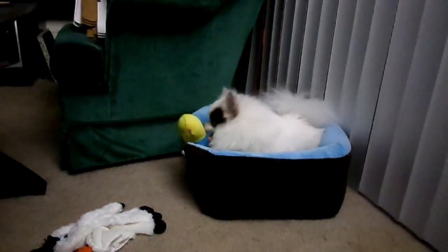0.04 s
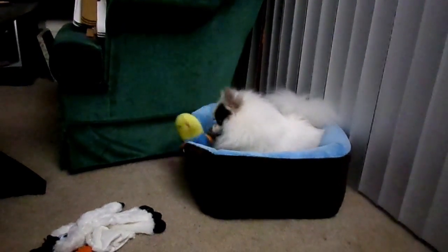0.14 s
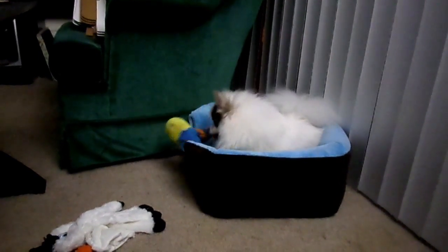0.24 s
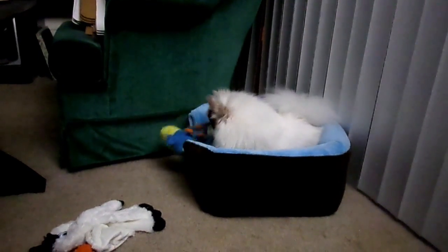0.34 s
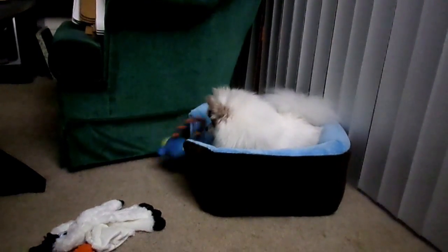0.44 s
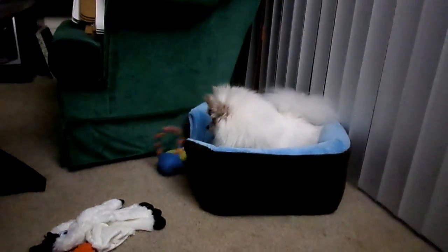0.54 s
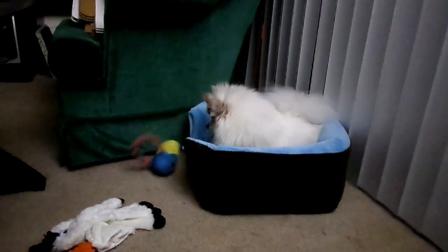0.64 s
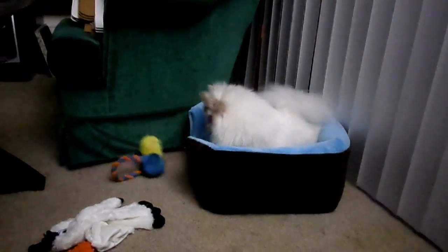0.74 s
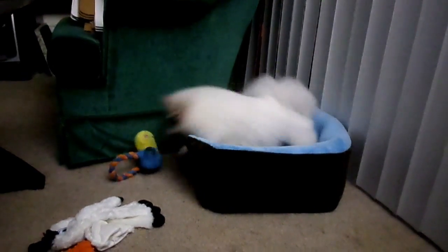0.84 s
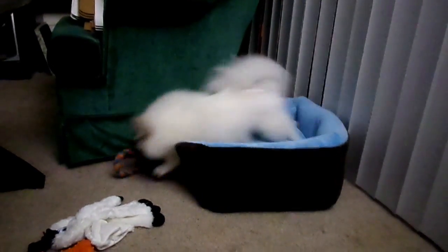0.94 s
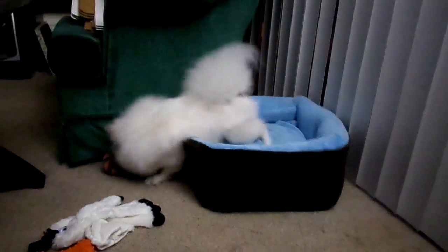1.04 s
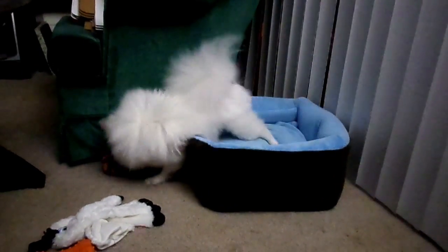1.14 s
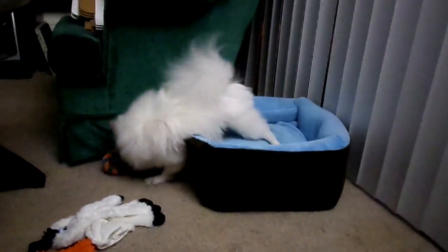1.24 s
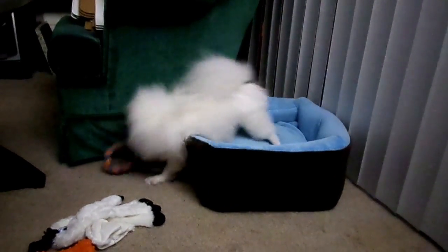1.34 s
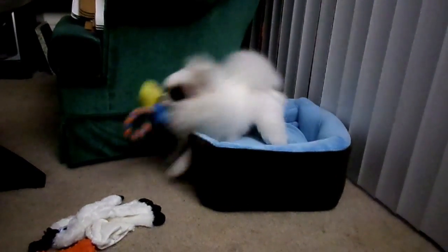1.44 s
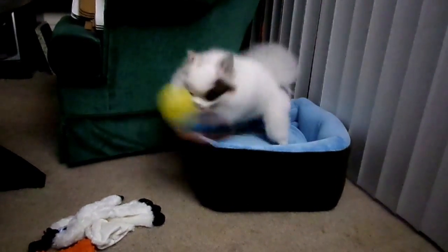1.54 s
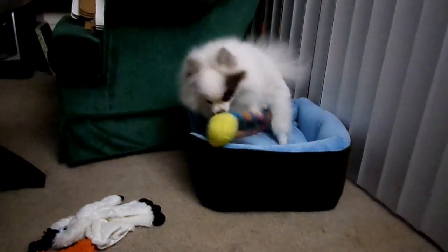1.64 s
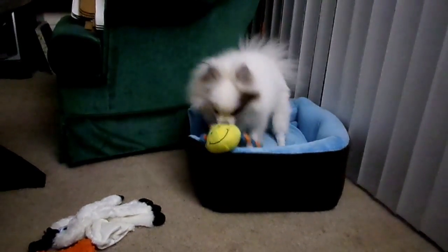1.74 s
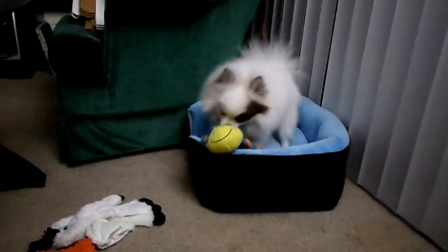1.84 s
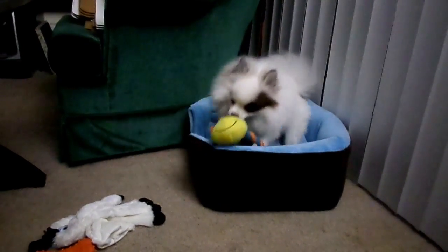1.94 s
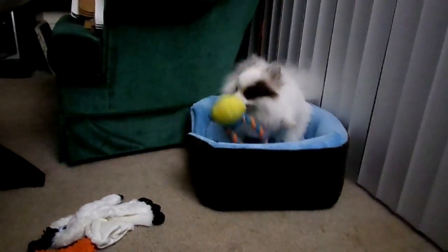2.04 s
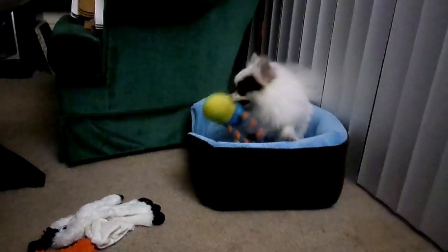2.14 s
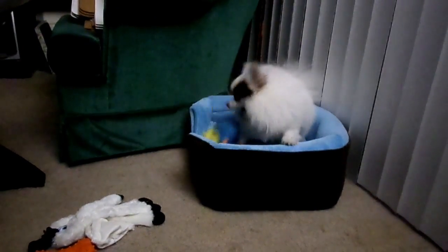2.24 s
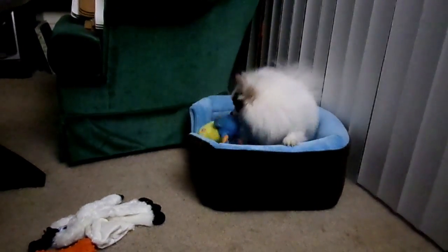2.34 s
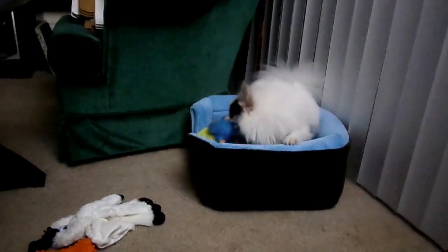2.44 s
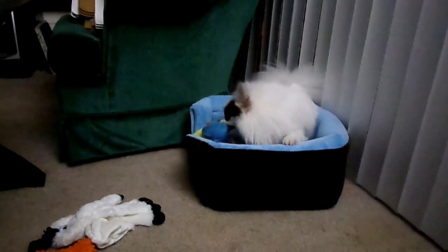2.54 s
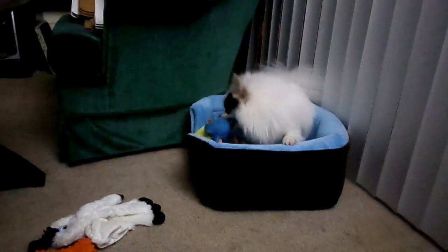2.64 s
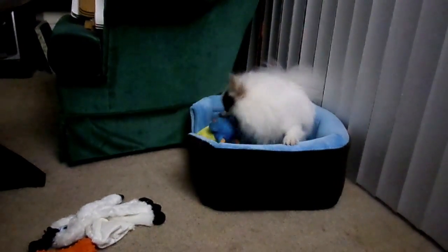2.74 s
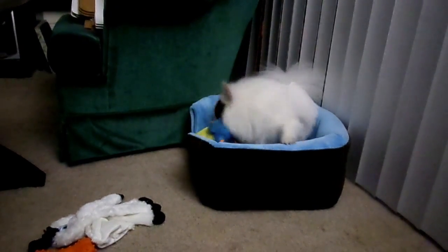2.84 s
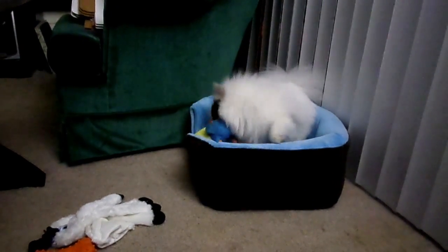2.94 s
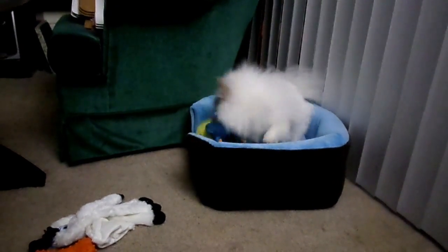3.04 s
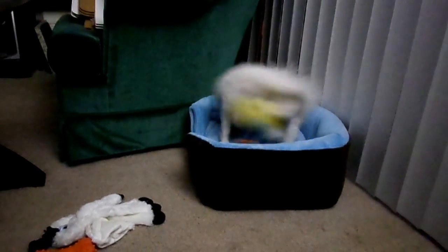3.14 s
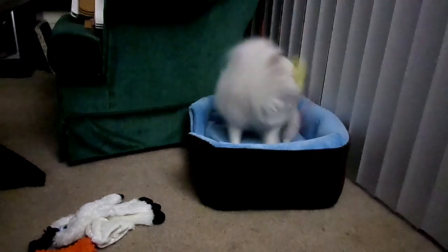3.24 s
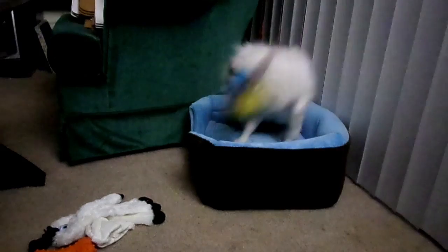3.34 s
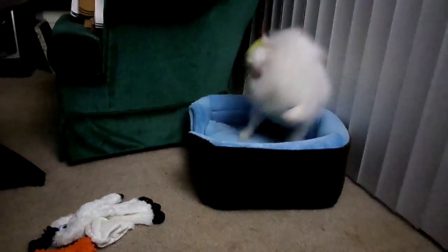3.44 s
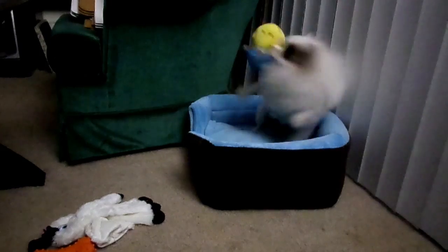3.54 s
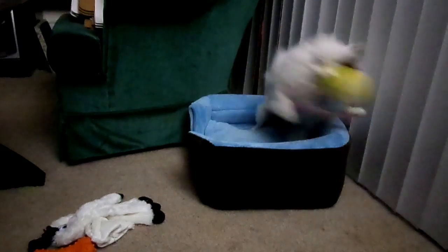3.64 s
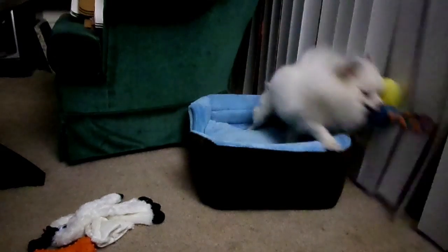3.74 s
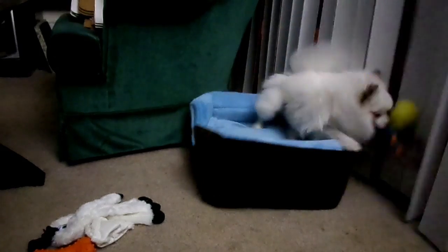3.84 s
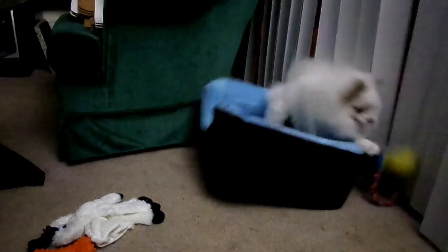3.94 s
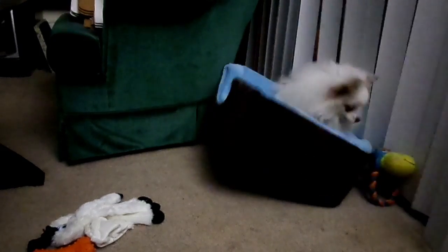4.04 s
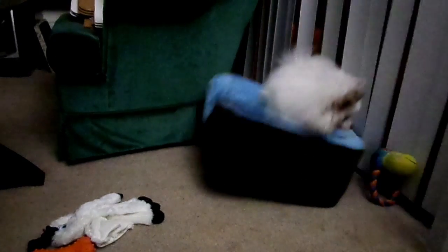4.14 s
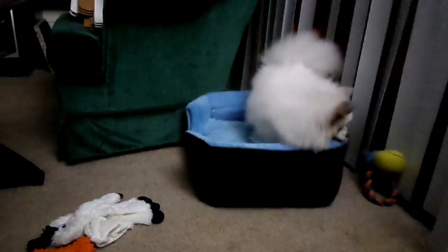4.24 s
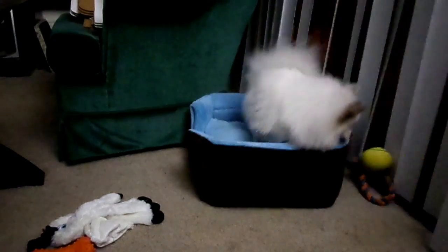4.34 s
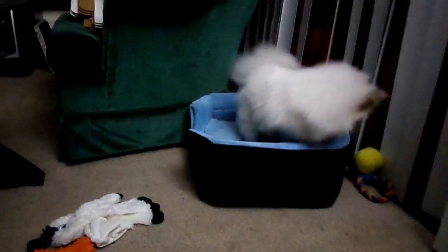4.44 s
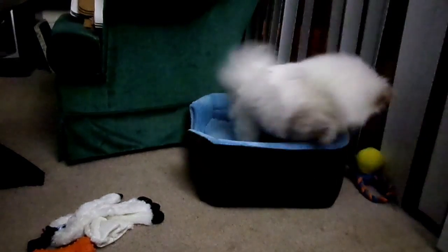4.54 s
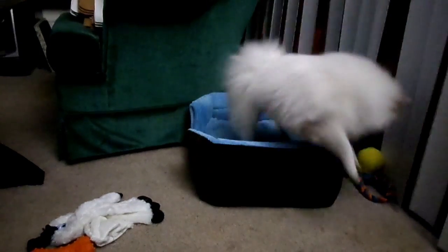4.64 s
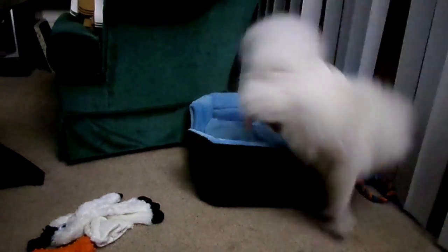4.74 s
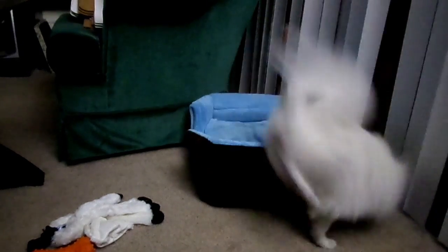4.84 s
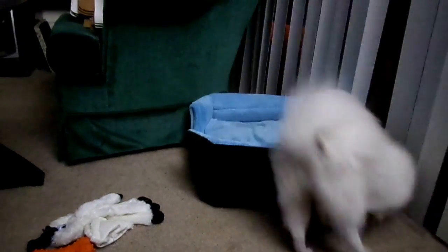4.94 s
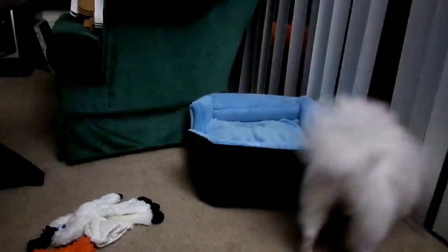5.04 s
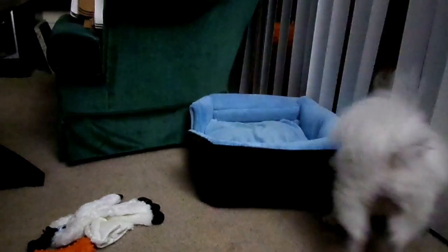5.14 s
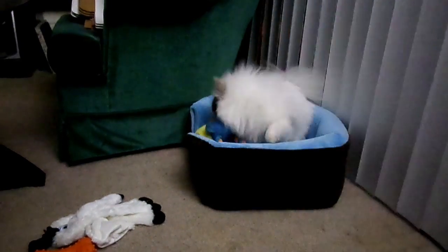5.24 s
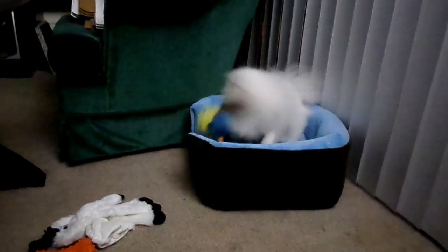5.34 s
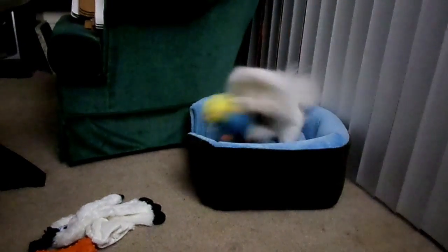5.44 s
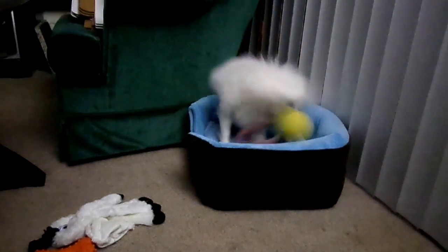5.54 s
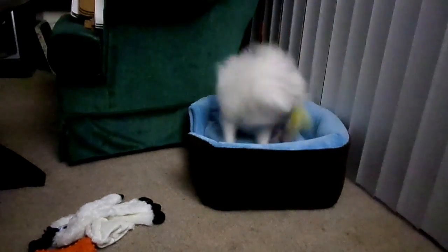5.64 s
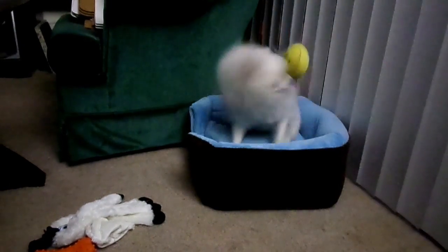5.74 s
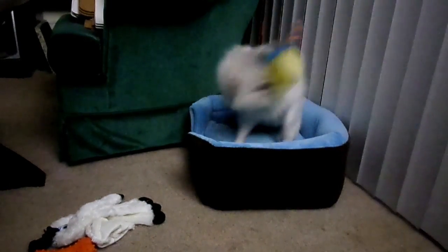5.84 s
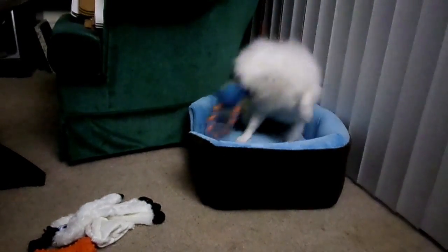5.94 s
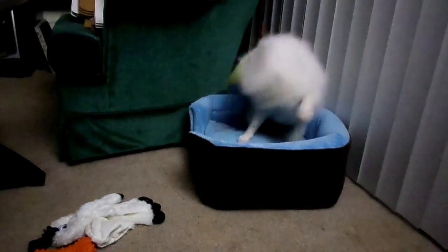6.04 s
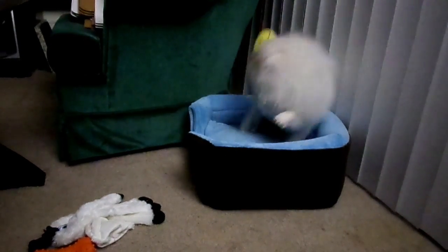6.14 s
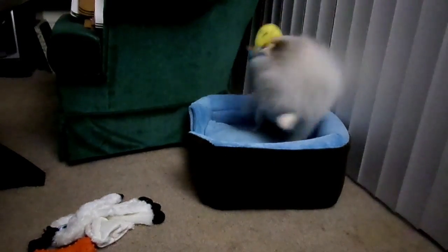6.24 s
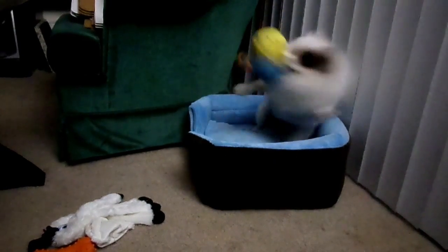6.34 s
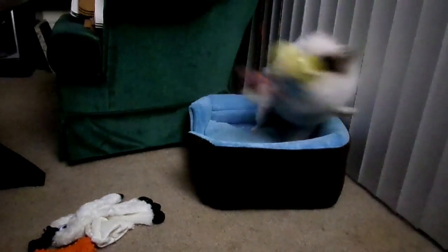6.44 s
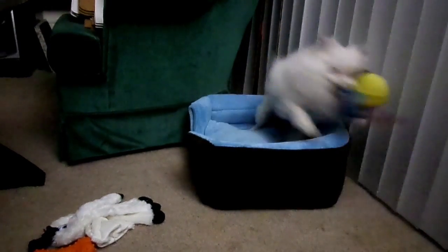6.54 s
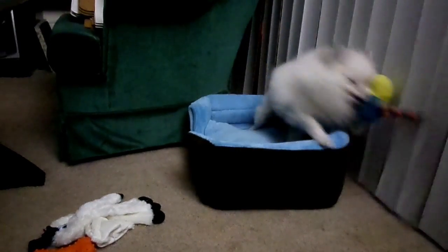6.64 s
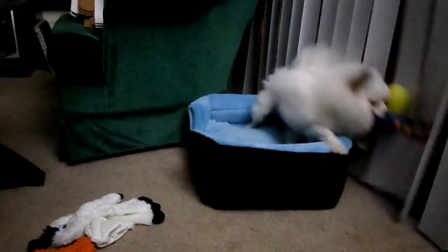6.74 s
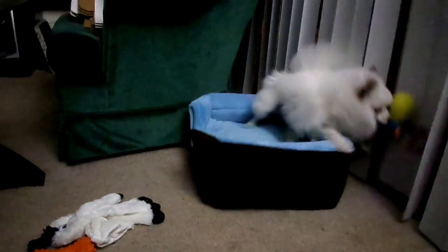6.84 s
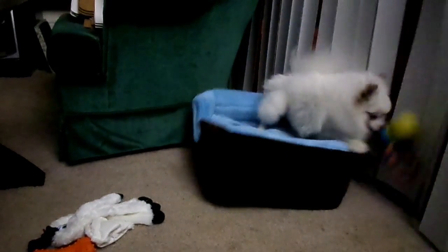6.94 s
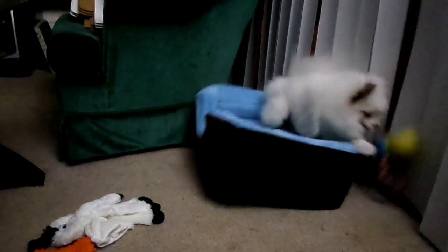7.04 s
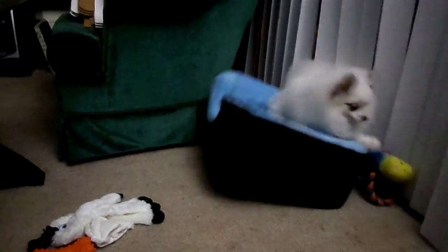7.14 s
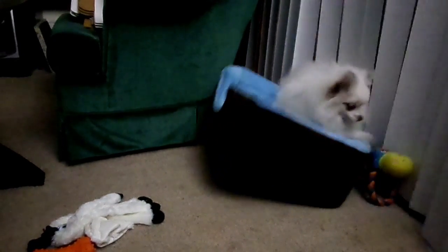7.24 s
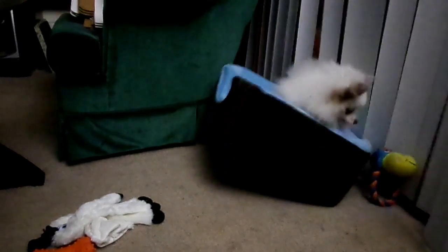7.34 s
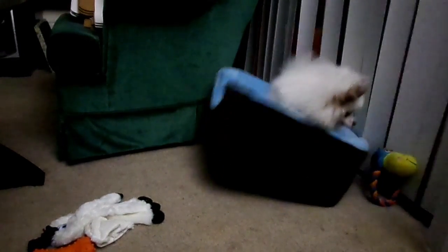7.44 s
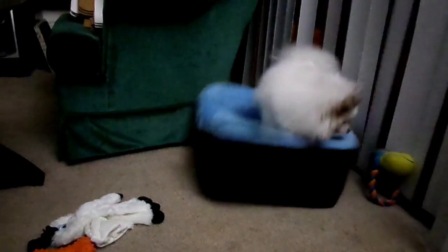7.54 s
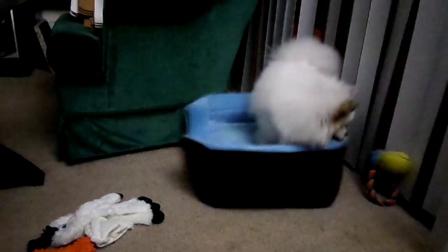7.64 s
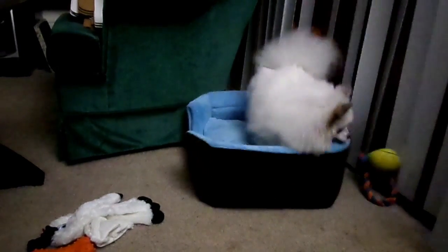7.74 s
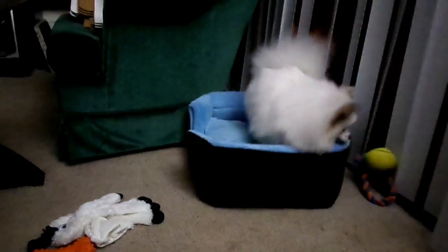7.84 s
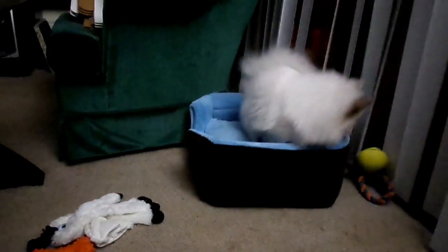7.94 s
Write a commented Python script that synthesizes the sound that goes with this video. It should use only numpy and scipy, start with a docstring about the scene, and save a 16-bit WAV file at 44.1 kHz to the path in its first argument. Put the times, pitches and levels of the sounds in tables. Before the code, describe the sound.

A quiet small carpeted room with faint steady air noise. From 0 to 3 seconds a puppy moves softly in a padded bed: nearly still at first, then muffled fabric strokes and light claw or toy taps from about 0.75, a small nose puff near 1.3, a soft bump at 1.4, rustling until about 2, then calmer. Around 3.0 to 3.4 brisk fur rustle and taps build, with a swish at 3.6. At 3.65 to 3.8 a rope toy slams into vertical plastic blinds: a loud, bright, clipped crash with hollow slaps and a thud. Slats slide and clack, the bed thumps back at 4.15, and scattered clacks fade toward 5.2. At 5.25 the throw replays at half speed, an octave lower: slow coarse rustling, a deep stretched crash around 6.5 to 6.8, a low thump near 7.45, then sparse dull clacks to the end at about 8 seconds.

```python
"""Paws and fur rustle in a padded bed on carpet, with light taps of claws and toy: a puppy scuffles about.
It then flings a rope toy into vertical plastic blinds, which crash, slide over each other and clack.
The bed tips and thumps back; then the throw is heard again at half speed, an octave lower.
Rubbing is noise cut into tiny contacts, clacks are decaying noise with resonances, thumps damped sines."""
import sys
import numpy as np
from scipy import signal
from scipy.fft import rfft, irfft
from scipy.io import wavfile
from scipy.ndimage import uniform_filter1d, map_coordinates

SR = 44100
rng = np.random.default_rng(int(sys.argv[2]) if len(sys.argv) > 2 else 0)


def generate_wav(signal):
    """Clip the signal to [-1, 1] and save it as 16-bit WAV at the path in sys.argv[1]."""
    frames = np.transpose(np.atleast_2d(signal))
    scaled = np.clip(frames, -1, 1) * 32767
    pcm = np.round(scaled).astype(np.int16)
    wavfile.write(sys.argv[1], SR, pcm)


N = 352800
TIME = np.arange(N) / SR

# slats striking the toy and each other, levels before the trims in clacks(): (time [s], crack level [dB],
# slat flex level [dB], middle over treble [dB], ring frequency [Hz], ring height [dB])
SLAT_CLACKS = [(3.6504, -9, -11, -13, 6910, 6.5), (3.6523, -8, -14, -7.5, 950, 12.5),
               (3.655, -4, -31, -11.5, 12560, -7.5), (3.6922, -4, -30.5, -25, 11700, 7.5),
               (3.7455, -19, -11.5, -10, 7400, -3.5), (3.7532, -2, -17.5, -6, 6700, 9),
               (3.76, -6.5, -19.5, -11.5, 3470, 20), (3.813, -22, -20, -8.5, 12780, 3.5),
               (3.8974, -20, -27.5, -19, 9400, 7.5), (3.9226, -24, -25.5, -17.5, 10630, 13),
               (3.9386, -2, -21.5, -11.5, 6620, 15), (3.971, -21, -35, -17.5, 12430, -8),
               (4.0416, -24, -25.5, -5.5, 11400, 8.5), (4.095, -24.5, -35, -22.5, 10900, 14.5),
               (4.182, -33.5, -31.5, -0.5, 1500, 3.5), (4.2121, -11.5, -23.5, -8, 8650, 15),
               (4.237, -21, -42, -25, 13490, 8), (4.2778, -25, -25.5, -5.5, 10400, 12),
               (4.2965, -25.5, -27, -12.5, 8800, 6.5), (4.3888, -24, -27, -8, 11400, 14),
               (4.445, -20.5, -29.5, -2.5, 5160, 9), (4.519, -6, -14.5, -6, 2590, 8.5),
               (4.567, -31, -30, -6.5, 3310, 7), (4.6195, -21, -19, -7, 3790, 8),
               (4.7056, -22, -34.5, -2, 2300, 8), (4.718, -26, -21, -14, 13200, 11.5),
               (4.8042, -27, -38, -11.5, 11600, 10.5), (4.8511, -24, -30, -11, 10720, 13),
               (4.9499, -14, -17, -9.5, 3140, 7.5), (4.9919, -24, -19, -4, 9600, 17),
               (5.0227, -13.5, -25.5, -9, 12300, 10), (5.033, -21, -36.5, -1, 4260, 9.5),
               (5.1519, -10.5, -17.5, -7.5, 8320, 9), (5.178, -22, -26, -5, 5250, 7),
               (5.2358, -22, -42.5, -3, 11100, 21)]
# how hard the slats rub as the toy drives in and they swing, part and close again: (time [s], level [dB])
SLAT_SWAY = [(3.655, -29), (3.70, -22), (3.735, -22), (3.80, -28.5), (3.88, -33.5), (4.13, -39.5),
             (4.47, -41), (4.51, -65), (4.55, -41), (4.82, -43), (5.0, -40.5), (5.25, -44.5)]
# relative spectrum of a slat's thin edge: (frequency [Hz], level per Hz [dB])
SLAT_EDGE = [(2500, -38), (5000, -14), (7000, -7.5), (9000, -7), (10500, -2.5), (11500, -.5), (12400, 0),
             (13500, -6.5), (15500, -14), (17000, -23)]
# relative spectrum of a slat's broad face: (frequency [Hz], level per Hz [dB])
SLAT_FACE = [(200, -25), (500, -4.5), (900, -2.5), (1500, -4), (2500, -2), (4000, -3.5), (6000, -3.5),
             (8500, -12.5), (14000, -41)]
# relative spectrum of a hollow body, for bed padding and blinds: (frequency [Hz], level per Hz [dB])
HOLLOW_BODY = [(200, -28.5), (330, -2.5), (385, -3.5), (410, 2.5), (445, -8.5), (510, -2.5), (620, -1.5),
               (780, -2), (950, -19.5), (1600, -26), (4000, -51)]


def amp(db):
    """Decibels to gain."""
    return 10 ** (np.asarray(db) / 20)


def unit(x):
    """Scale to rms 1."""
    return x / np.sqrt(np.mean(x ** 2) + 1e-20)


def along(points, hz):
    """Read (Hz, value) points on a log frequency axis."""
    f, v = np.transpose(points)
    return np.interp(np.log(hz + 1), np.log(f), v)


def levels(rows, fade=.006):
    """One gain per sample for each dB column, fading out (in seconds) beyond the table's ends."""
    s, *columns = np.transpose(rows)
    outside = np.maximum(np.maximum(s[0] - TIME, TIME - s[-1]), 0)
    return [amp(np.interp(TIME, s, db)) * np.exp(-outside / fade) for db in columns]


def wobble(rate):
    """A smooth random curve, rate knots a second."""
    knots = rng.standard_normal(int(N * rate / SR) + 4)
    return map_coordinates(knots, [TIME * rate])


def swell(s, rise, fall):
    """A smooth rise to 1 at time s and a smooth fall, all in seconds."""
    out = np.zeros(N)
    near = slice(*np.searchsorted(TIME, [s - 4 * rise, s + 4 * fall]))
    t = TIME[near] - s
    out[near] = np.exp(-(t / np.where(t < 0, rise, fall)) ** 2)
    return out


def add(track, s, sound):
    """Mix a sound in at time s."""
    part = track[max(round(s * SR), 0):][:len(sound)]
    part += sound[:len(part)]


def colour(x, spectrum, size=4096):
    """Causal filter of unit energy with the given spectrum."""
    cepstrum = irfft(np.log(amp(along(spectrum, np.fft.rfftfreq(size, 1 / SR)))))
    # folding the cepstrum forward puts the energy at the start (minimum phase)
    cepstrum[1:size // 2] *= 2
    cepstrum[size // 2 + 1:] = 0
    kernel = irfft(np.exp(rfft(cepstrum)))
    return signal.fftconvolve(x, kernel / np.linalg.norm(kernel))[:N]


def low_cut(x, hz):
    """Take away the deep bass."""
    return signal.sosfilt(signal.butter(2, hz, "high", fs=SR, output="sos"), x)


def ticks(rate, spread_db, life, rub):
    """Envelope of rms 1: rate contacts a second of random size, each dying in life s, over steady rubbing."""
    sizes = amp(spread_db * np.minimum(rng.standard_normal(N), 2))
    contact = sizes * (rng.random(N) < rate / SR)
    power = signal.lfilter([1], [1, -np.exp(-2 / (life * SR))], contact ** 2)
    return unit(np.sqrt(power / power.mean() + rub))


def grains(envelope, spectrum):
    """Noise cut up by an envelope and coloured by what it shakes."""
    return unit(colour(envelope * rng.standard_normal(N), spectrum))


def room_air(level_db=-62):
    """Faint steady noise of the room."""
    # relative spectrum of the noise: (frequency [Hz], level per Hz [dB])
    air_spectrum = [(24, -49), (40, -28), (166, -7), (188, -4), (333, -7), (577, -11.5), (1050, -14.5),
                    (1130, -17), (4570, -24), (10100, -27), (15500, -39.5)]
    return amp(level_db) * grains(1, air_spectrum)


def bed_note(rub, hz=410, width_hz=16, ring_db=-8):
    """Rubbing excites the bed's one hollow resonance."""
    b, a = signal.iirpeak(hz, hz / width_hz, SR)
    # the narrow band passes little noise power, so make it up
    gain = amp(ring_db) * np.sqrt(SR / (np.pi * width_hz))
    return gain * signal.lfilter(b, a, rub * rng.standard_normal(N))


def snuffle(level_db=-44.5):
    """One puff of the puppy's nose at the toy: a short swell of coloured noise."""
    # relative spectrum of the puff: (frequency [Hz], level per Hz [dB])
    nose_spectrum = [(400, -34), (1100, -9), (1400, -3), (1700, -8), (2150, -1), (2850, -12.5),
                     (3950, -1.5), (5800, -11), (7400, -6), (8800, -10), (12300, -1), (15500, -29)]
    return amp(level_db) * swell(1.322, rise=0.037, fall=0.023) * grains(1, nose_spectrum)


def puppy(padding_db=-3, cloth_db=2.0, shuffle_db=-1, shuffle_low_hz=85):
    """Paws and fur rub the fabric, the bed shifts and rocks on the carpet, the nose puffs at the toy."""
    # how busily the puppy moves, before the trims above: (time [s], level [dB])
    activity_rows = [(0.0, -61), (0.68, -67.5), (0.9, -58), (1.7, -57.5), (2.3, -60.5), (2.85, -65),
                     (3.2, -55), (5.25, -59.5)]
    # strokes of paws and fur over the bed:
    # (time of peak [s], length [s], padding level [dB], fur and cloth level [dB])
    stroke_rows = [(0.779, 0.046, -47.5, -52), (0.928, 0.13, -52.5, -55), (1.09, 0.052, -53.5, -72),
                   (1.174, 0.049, -52, -60), (1.22, 0.055, -55, -73), (1.502, 0.072, -54, -49),
                   (1.635, 0.13, -53.5, -59), (1.924, 0.073, -50.5, -49.5), (1.972, 0.036, -51.5, -57),
                   (2.986, 0.09, -69, -57.5), (3.1, 0.13, -67, -47.5), (3.31, 0.13, -73, -48),
                   (3.372, 0.074, -48, -46)]
    # the bed rocks on the carpet as the puppy rears and leans over its rim: (time [s], level [dB])
    rocking_rows = [(3.07, -46), (3.25, -70.5), (3.63, -57), (3.79, -42), (3.9, -48), (4.25, -54),
                    (4.85, -60.5), (4.98, -47.5), (5.25, -57.5)]
    # relative spectrum of fur and cloth: (frequency [Hz], level per Hz [dB])
    cloth_spectrum = [(300, -14), (900, 2), (2000, -0.5), (4500, -4), (8000, -4), (10000, -1.5),
                      (11800, -0.5), (13500, -7.5), (16000, -14)]
    # relative spectrum of the bed moving on the carpet: (frequency [Hz], level per Hz [dB])
    low_spectrum = [(15, -54.5), (35, 3), (70, -2.5), (110, -0.5), (160, -1.5), (260, -1.5), (400, -8.5),
                    (900, -40)]
    press_share = 0.41  # share of a stroke spent pressing down

    activity, = levels(activity_rows)
    rocking, = levels(rocking_rows)
    padding = amp(padding_db) * activity
    cloth = amp(cloth_db) * activity
    for s, length, press_db, rub_db in stroke_rows:
        stroke = swell(s, press_share * length, (1 - press_share) * length)
        padding = np.hypot(padding, amp(press_db) * stroke)
        cloth = np.hypot(cloth, amp(rub_db) * stroke)

    fibres = ticks(rate=600, spread_db=4, life=.001, rub=1.5)
    rustle = amp(0.68 * wobble(25)) * cloth * grains(fibres, cloth_spectrum)
    uneven_drag = low_cut(grains(amp(2.1 * wobble(6)), low_spectrum), shuffle_low_hz)
    shuffle = amp(shuffle_db) * activity * uneven_drag
    rock = rocking * grains(amp(2.1 * wobble(18)), low_spectrum)
    bed = padding * grains(fibres, HOLLOW_BODY) + shuffle + rock
    return rustle + bed + bed_note(padding) + snuffle()


def contacts(count=42, per_s=26, crack_db=7.5, middle_db=-7, ring_db=7, scatter_db=5.0):
    """Taps, clacks and stray brushes of swaying slats, all in the columns of SLAT_CLACKS."""
    # light taps of claws and toy, before the trims in clacks():
    # (time [s], crack level [dB], middle over treble [dB], ring frequency [Hz], ring height [dB])
    tap_rows = [(0.7528, -43, -8, 12500, 10), (0.7585, -40, 1, 3800, 18), (0.7822, -39, -1, 11600, 14),
                (0.9038, -39, -14, 11600, 6), (0.9347, -41, -10, 10000, 2), (0.9957, -47, -22, 11800, 14),
                (1.0708, -42, -12, 7940, 13), (1.4257, -50, -14, 11760, 14), (1.4655, -37, 0, 11000, 9),
                (1.5823, -38.5, -7, 11900, 5), (1.616, -43, -10, 11800, 16), (1.9045, -40, -26, 11800, 10),
                (2.0143, -44, -14, 10980, 10), (2.142, -44.5, -17, 11500, 15), (2.3942, -47, -3, 1590, 2),
                (2.6123, -48.5, 5, 2860, 12), (3.202, -37, -1, 9620, 14), (3.2465, -37.5, 4, 1690, 7.5),
                (3.295, -29.5, -7.5, 6400, 16), (3.345, -28.5, -25.5, 13940, 16.5),
                (3.357, -27, -7.5, 11500, 8.5), (3.5228, -30, -13.5, 8230, 15),
                (3.582, -24, -21, 14000, 16)]
    tap_flex_db = -8.5  # relative to the crack
    taps = [(s, db, db + tap_flex_db, *tone) for s, db, *tone in tap_rows]

    # one brush at a random moment of each time slot, as strong as the sway give or take the scatter
    when, sway_db = np.transpose(SLAT_SWAY)
    jitter, spot, force = rng.random((count, 3)).T
    times = when[0] + (np.arange(count) + jitter) / per_s
    strengths = np.interp(times, when, sway_db) + scatter_db * (2 * force - 1)
    spots_hz = 1200 * 10 ** spot
    brushes = [(s, db + crack_db, db, middle_db, hz, ring_db)
               for s, db, hz in zip(times, strengths, spots_hz)]
    return taps + SLAT_CLACKS + brushes


def clacks(crack_t60=0.0046, edge_t60=.024, face_t60=0.071, flex_db=3, crack_db=5.5, face_db=-1.5,
           ring_width_hz=550):
    """Each contact is a sharp crack, then the slat flexes; the spot struck sets its own resonances."""
    edge, face = np.zeros(N), np.zeros(N)
    t = np.arange(4096) / SR
    hz = np.fft.rfftfreq(len(t), 1 / SR)
    knots_hz = np.arange(0, SR, 300)
    for s, crack, flex, middle, ring_hz, ring_db in contacts():
        minor_modes_db = 3.5 * np.interp(hz, knots_hz, rng.standard_normal(len(knots_hz)))
        main_mode_db = ring_db / (1 + ((hz - ring_hz) / ring_width_hz) ** 2)
        spot = amp(minor_modes_db + main_mode_db)
        sharp_crack = amp(crack + crack_db - 60 * t / crack_t60)
        # the broad face of a slat rings longer than its thin edge
        for track, share, t60 in (edge, 1, edge_t60), (face, amp(middle), face_t60):
            shake = unit(irfft(spot * np.exp(2j * np.pi * rng.random(len(hz)))))
            slat_flex = amp(flex + flex_db - 60 * t / t60) * (1 - np.exp(-t / 0.00046))
            balance = share / np.hypot(1, amp(middle))
            add(track, s, (sharp_crack + slat_flex) * shake * balance)
    return colour(edge, SLAT_EDGE) + amp(face_db) * colour(face, SLAT_FACE)


def ring(modes, t, rise=1e-4):
    """Damped resonances struck once, with a peak of 1."""
    wave = sum(amp(db) * np.sin(2 * np.pi * hz * t) * np.exp(-np.pi * width * t) for hz, width, db in modes)
    wave = wave * (1 - np.exp(-t / rise))
    return wave / np.abs(wave).max()


def thumps(thud_db=1, slap_db=6, thud_width_hz=70, low_hz=45):
    """Soft blows: a dull thud, and a hollow slap where the toy meets the slats."""
    # blows of toy, paws and bed, before the trims above:
    # (time [s], peak level [dB], hollow slap over thud [dB], thud frequency [Hz])
    blow_rows = [(1.429, -39, -27, 196), (3.076, -38.5, -13, 100), (3.14, -40.5, -12.5, 200),
                 (3.365, -49, 4, 201), (3.652, -23.5, 12, 240), (3.693, -27, -1, 260),
                 (3.753, -16, -22.5, 282), (4.143, -24, -23, 157.7)]
    # resonances of the slap: (frequency [Hz], width [Hz], relative level [dB])
    slap_modes = [(440, 85, 0), (829, 160, -7), (1180, 130, -7)]
    out = np.zeros(N)
    t = np.arange(SR // 5) / SR
    # the soft toy takes a moment to press home
    hollow_slap = ring(slap_modes, t, rise=0.0029)
    for s, db, slap, thud_hz in blow_rows:
        thud = ring([(thud_hz, thud_width_hz, 0)], t)
        add(out, s, amp(db + thud_db) * thud + amp(db + slap + slap_db) * hollow_slap)
    # such small bodies radiate little deep bass
    return low_cut(out, low_hz)


def chatter(stir_db=-7.5, rise_s=0.0051, t60_s=0.15, lead_s=0.0073):
    """Strength of the rattle: the sway of the blinds plus the neighbours each clack stirs up."""
    sway, = levels(SLAT_SWAY, fade=0.0034)
    power = sway ** 2
    t = np.arange(SR // 2) / SR
    stir = (1 - np.exp(-t / rise_s)) * amp(stir_db - 60 * t / t60_s)
    for s, _, flex, *_ in SLAT_CLACKS:
        # the slats graze just before they clack
        add(power, s - lead_s, (amp(flex) * stir) ** 2)
    return np.sqrt(power)


def patchy(x, depth_db=3.5):
    """From moment to moment other slats touch, each with resonances of its own."""
    z = signal.stft(x, nperseg=256)[2]
    # random gains, smoothed over neighbouring frequencies and then over time
    field = uniform_filter1d(rng.standard_normal(z.shape), size=4, axis=0)
    field = uniform_filter1d(field, size=4, axis=1)
    return unit(signal.istft(z * amp(depth_db * unit(field)), nperseg=256)[1][:N])


def blinds(face_db=-5, body_db=-3, sweep_db=-2, sweep_face_db=-11, sweep_body_db=-17):
    """Slats slide and chatter: small contacts tick on their edges and clatter on their faces."""
    rattle = chatter()
    # the hollow body swells less than the edges, about this level
    hollow_ref = amp(-45)
    body = hollow_ref * (rattle / hollow_ref) ** 0.57
    # the swung toy grazes the slats
    sweep = amp(-26.5) * swell(3.58, rise=0.034, fall=0.046)

    sharp = ticks(rate=650, spread_db=4.5, life=.0006, rub=.2)
    blunt = ticks(rate=500, spread_db=3.5, life=.0014, rub=.3)
    swish = ticks(rate=2500, spread_db=3, life=.0008, rub=.6)
    # pushed hard or dragged by the toy, many slats rub at once and the single ticks merge into a swish
    push = rattle + 10 * sweep
    crowd = push / (push + amp(-27))
    sharp = (1 - crowd) * sharp + crowd * swish
    blunt = (1 - crowd) * blunt + crowd * swish

    edge_level = rattle + amp(sweep_db) * sweep
    face_level = amp(face_db) * rattle + amp(sweep_face_db) * sweep
    body_level = amp(body_db) * body + amp(sweep_body_db) * sweep
    bright = edge_level * patchy(grains(sharp, SLAT_EDGE))
    clatter = face_level * patchy(grains(sharp / 2 + blunt, SLAT_FACE))
    hollow = body_level * grains(blunt, HOLLOW_BODY)
    return bright + clatter + hollow


def room(x, build=0.00083, size=4410):
    """The short answer of a small carpeted room: decaying noise, drawn afresh every tenth of a second."""
    # decay of the room: (frequency [Hz], time to fall 60 dB [s])
    decay_rows = [(200, 0.16), (1000, 0.35), (5000, 0.19), (14000, 0.28)]
    out = np.zeros(N)
    for start in range(0, N, size):
        hz, t, z = signal.stft(rng.standard_normal(SR // 3), SR, nperseg=256)
        decay = amp(-60 * t / along(decay_rows, hz)[:, None])
        tail = signal.istft(z * decay * (1 - np.exp(-t / build)), SR, nperseg=256)[1]
        add(out, start / SR, signal.fftconvolve(x[start:start + size], tail / np.linalg.norm(tail)))
    return out


def scene(room_db=-8):
    """Puppy, slats and blows over the faint room noise; slats and blows also sound in the room."""
    slats_and_blows = clacks() + thumps() + blinds()
    wet = amp(room_db) * room(slats_and_blows)
    return (puppy() + slats_and_blows + wet + room_air())[None]


def overload(x, top_hz):
    """Clip at full scale, then keep almost nothing above the band limit."""
    low_pass = 1 / (1 + (np.fft.rfftfreq(N, 1 / SR) / top_hz) ** 80)
    return irfft(rfft(np.clip(x, -1, 1)) * low_pass, N)


def record(dry):
    """Brief level dips, microphone overload on the crash, the half-speed replay and the band limit."""
    # the level dips briefly: (time [s], half width [s])
    dip_rows = [(3.041, 0.005), (3.642, 0.0064)]
    replay_at_s, replay_from_s = 5.25, 3.04475
    mic_top_hz, top_hz = 17000, 16200
    live = dry[0]
    for s, width in dip_rows:
        live = live * (1 - .97 * np.exp(-((TIME - s) / width) ** 4))
    live = overload(live, mic_top_hz)
    # twice the samples at the same rate: half speed, an octave lower
    slow = signal.resample_poly(live[round(replay_from_s * SR):], 2, 1, window=("kaiser", 9))
    cut = round(replay_at_s * SR)
    return overload(np.concatenate([live[:cut], slow[:N - cut]]), top_hz)[None]


dry = scene()
out = record(dry)
generate_wav(out)
```